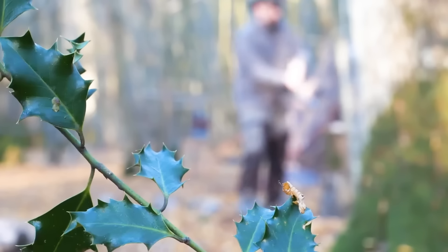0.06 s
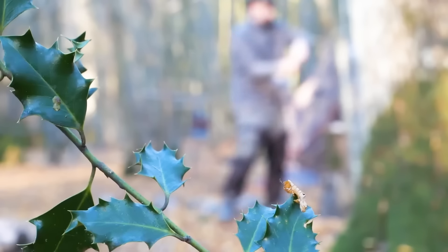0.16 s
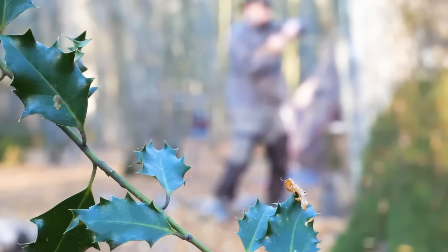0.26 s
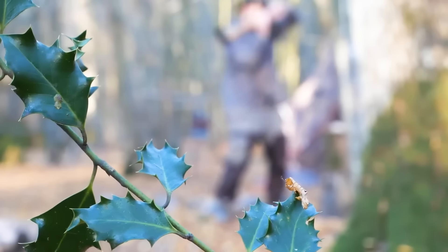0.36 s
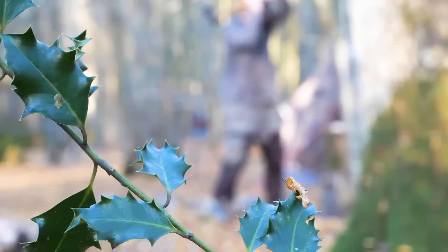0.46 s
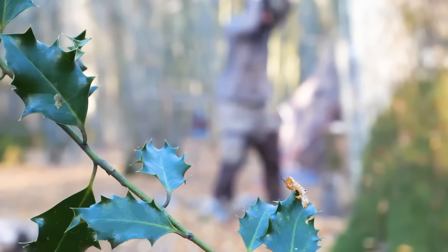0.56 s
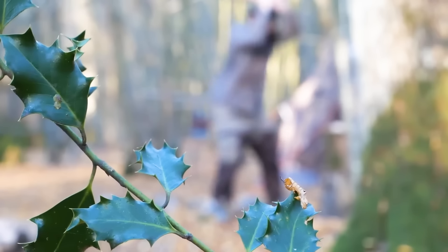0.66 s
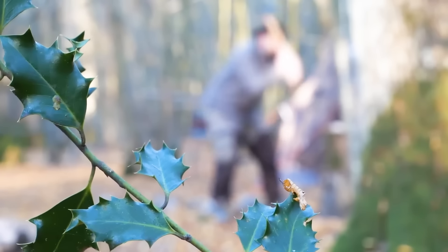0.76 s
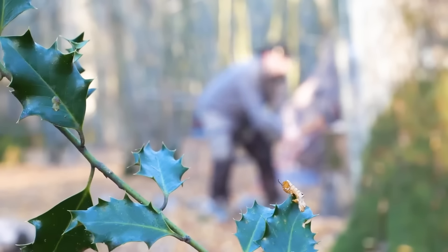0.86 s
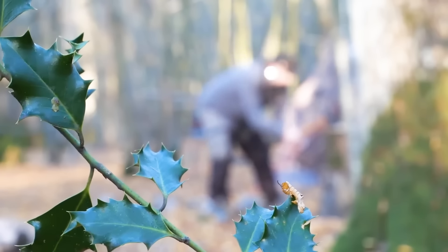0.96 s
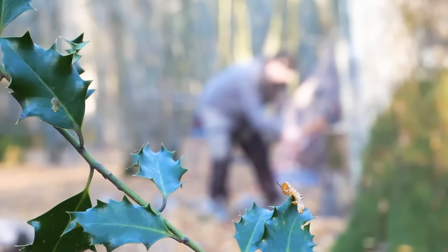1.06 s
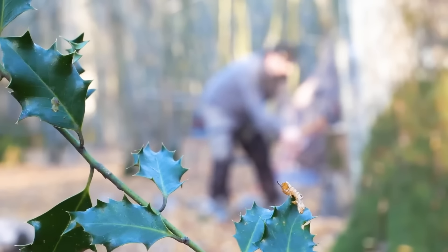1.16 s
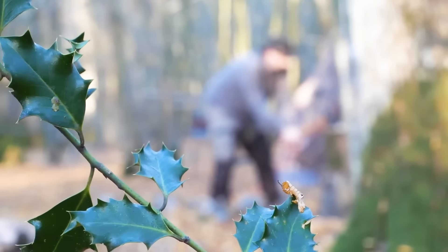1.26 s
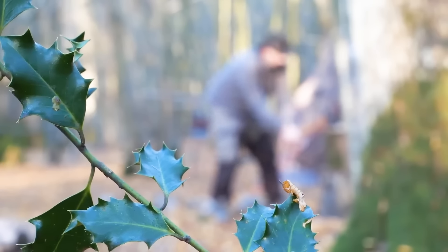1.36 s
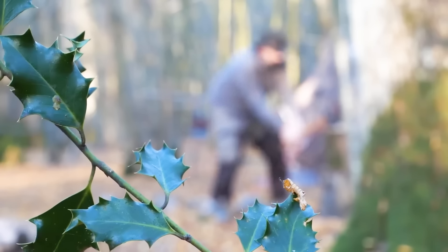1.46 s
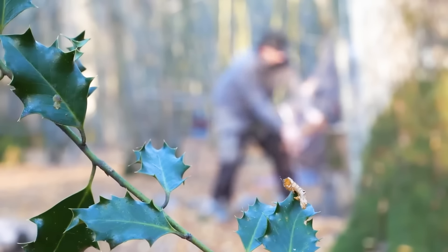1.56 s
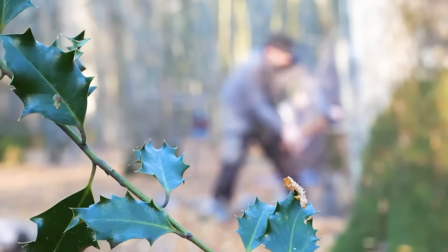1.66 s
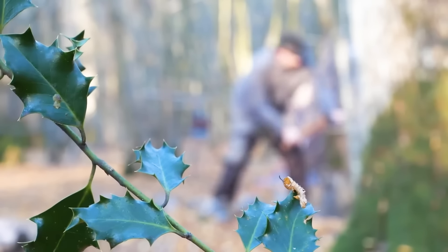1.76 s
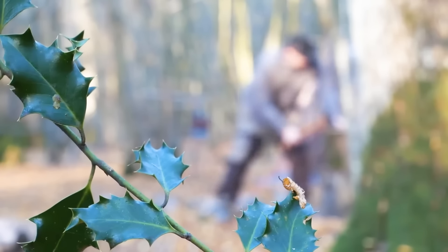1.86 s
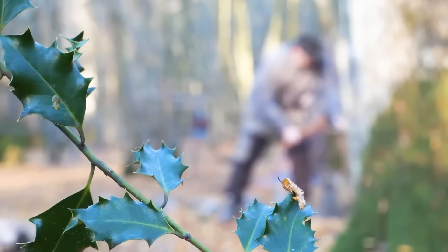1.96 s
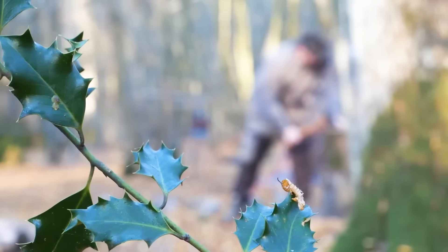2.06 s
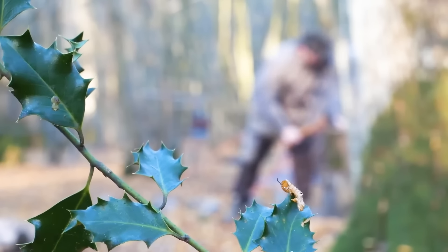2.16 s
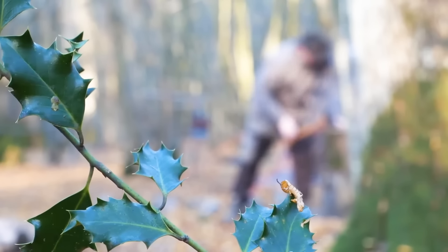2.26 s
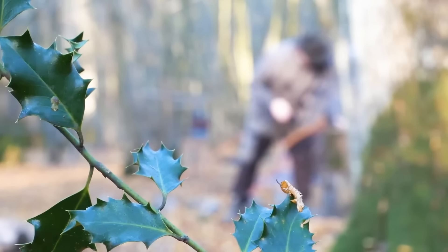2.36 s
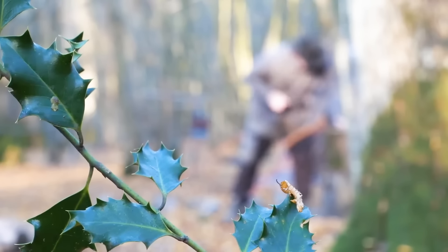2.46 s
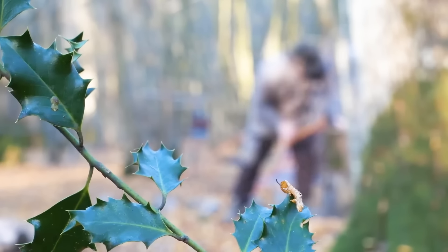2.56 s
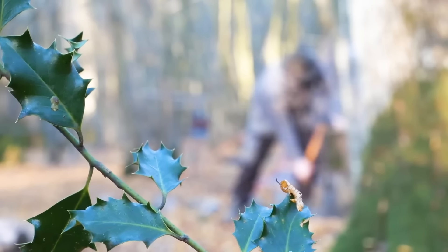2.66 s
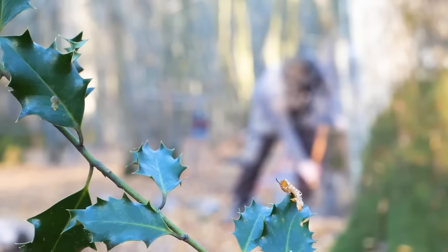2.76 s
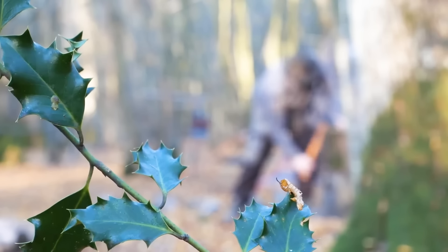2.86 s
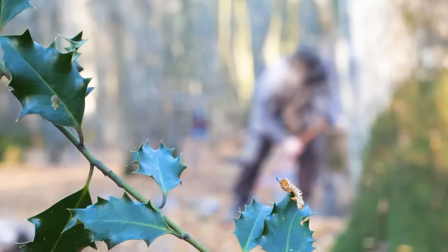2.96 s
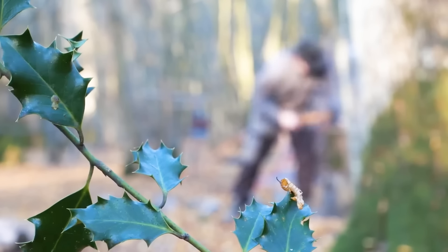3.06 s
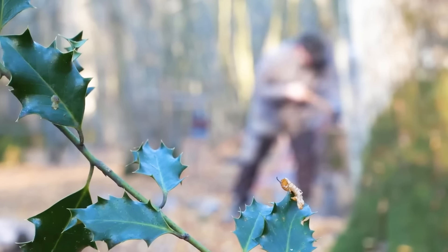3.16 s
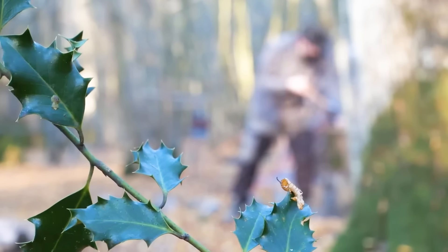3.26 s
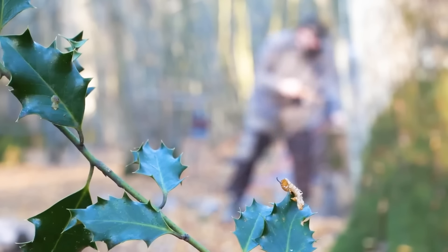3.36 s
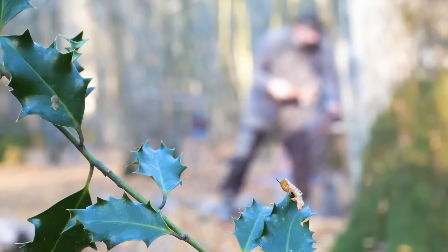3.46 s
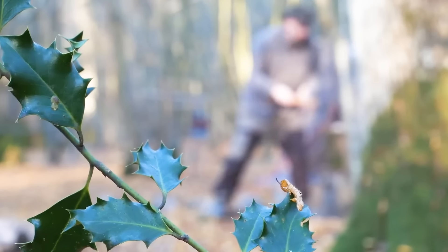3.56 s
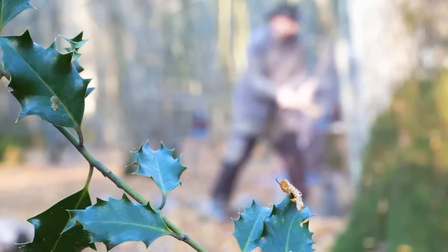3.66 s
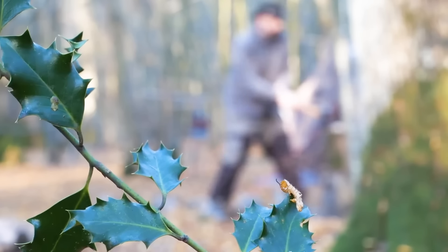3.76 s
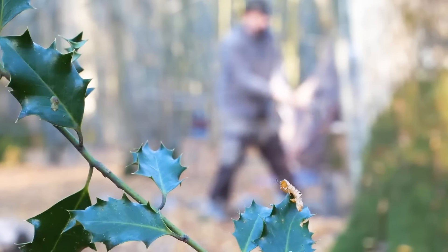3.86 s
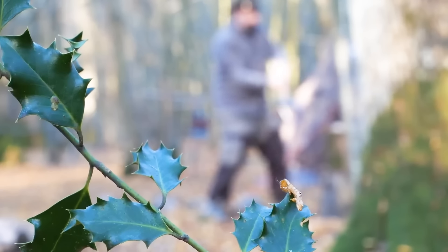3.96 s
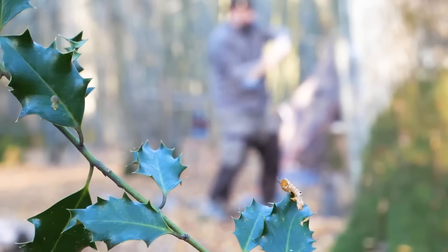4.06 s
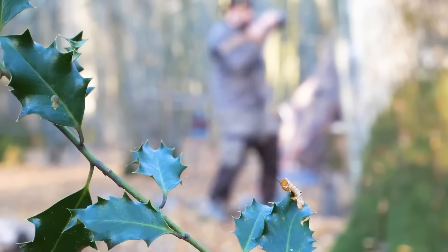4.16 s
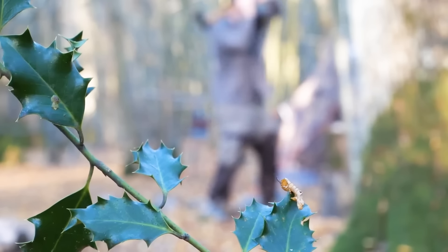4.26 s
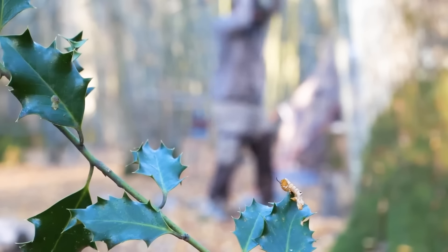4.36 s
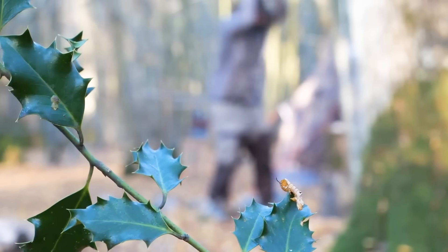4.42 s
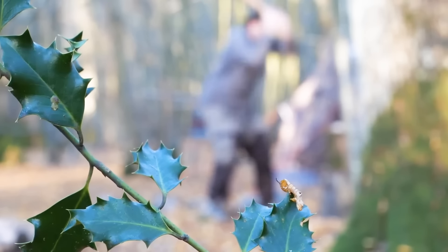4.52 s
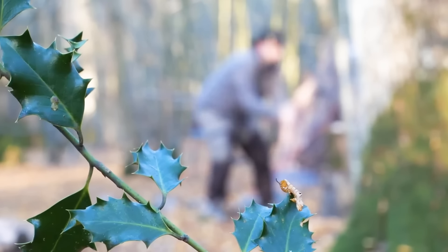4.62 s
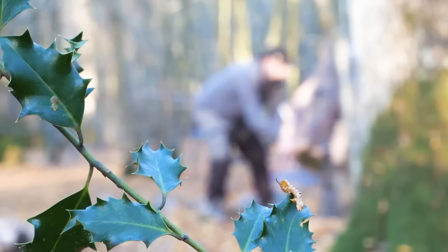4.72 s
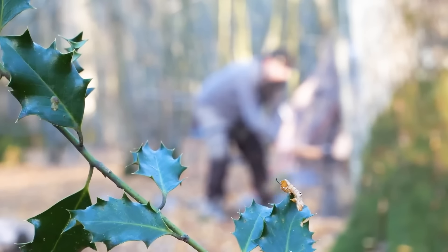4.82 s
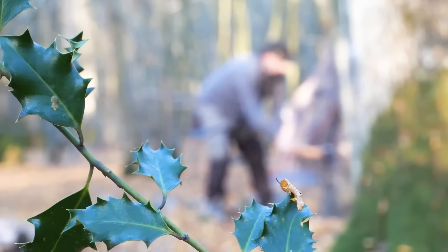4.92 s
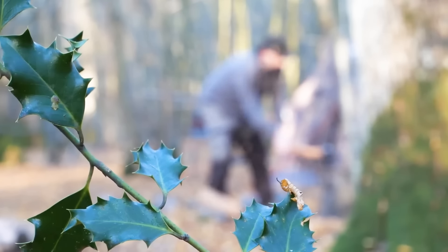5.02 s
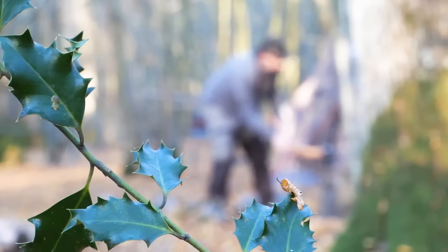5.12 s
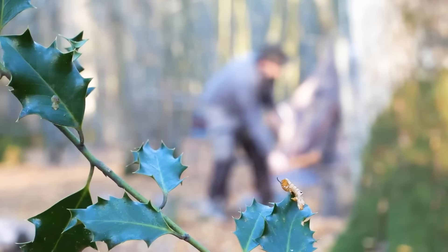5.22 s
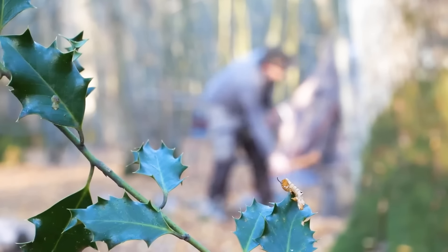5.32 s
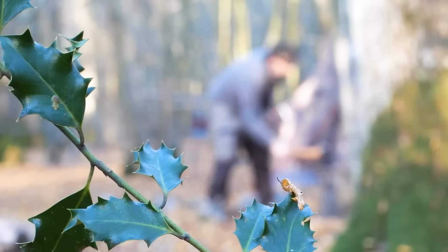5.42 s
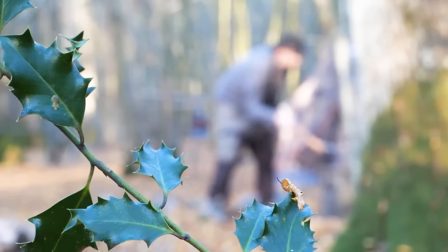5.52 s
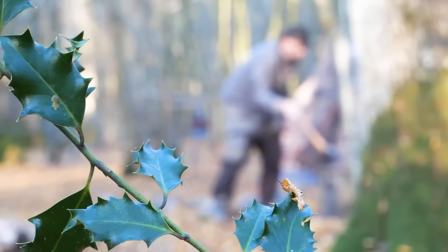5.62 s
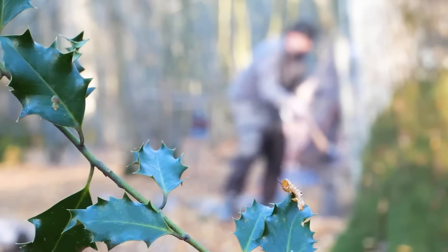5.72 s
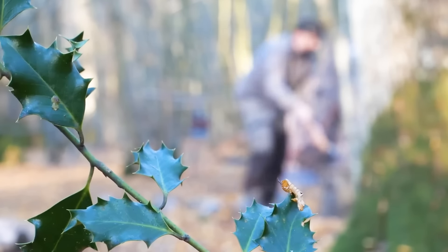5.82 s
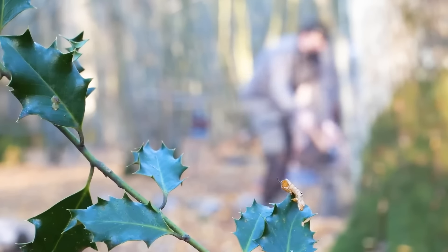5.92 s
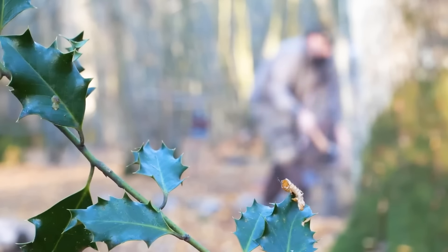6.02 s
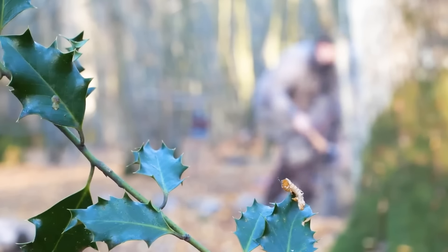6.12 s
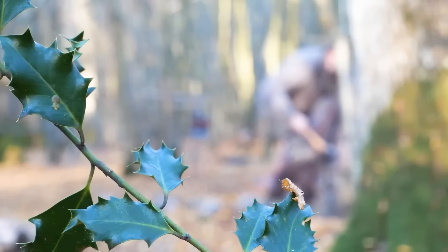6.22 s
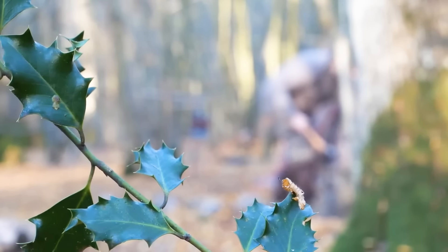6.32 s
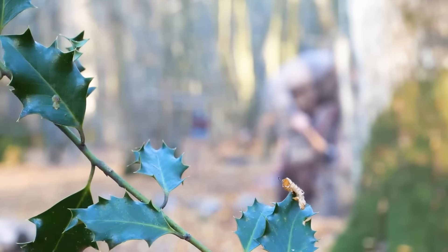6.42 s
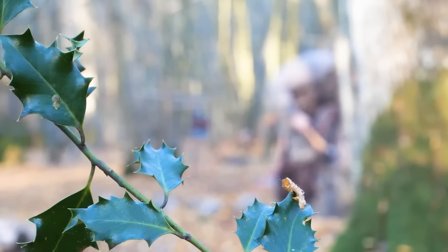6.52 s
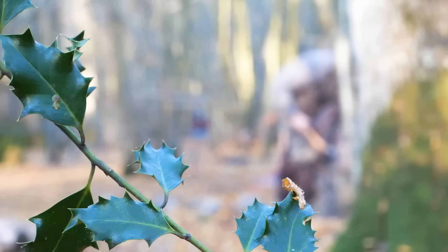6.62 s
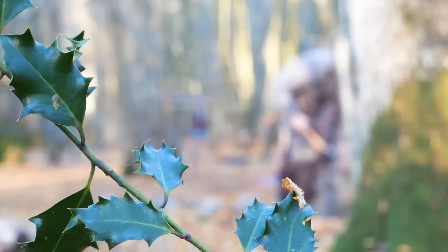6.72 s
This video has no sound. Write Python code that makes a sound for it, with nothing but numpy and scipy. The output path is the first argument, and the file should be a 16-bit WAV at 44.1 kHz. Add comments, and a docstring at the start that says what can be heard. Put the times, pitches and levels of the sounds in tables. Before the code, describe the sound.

Quiet woodland with a steady, faint far rush and low hum. A jacket swishes, leaves stir and twigs snap, then an axe cracks a log loudly, its echo scattering off the trunks. Wood is set on the block with a soft knock, a billet clacks, and a second hard blow splits it. Rustles and thuds follow, then a thin bird whistle. One microphone hears the work among the trees.

```python
"""A quiet wood, heard by one microphone: a steady far rush of filtered noise and a far humming sine lie behind.
First a jacket swishes, dry leaves stir and twigs snap, all shaped noise; then an axe cracks a log on a block.
Decaying sines ring the log, noise tears its fibres, and a random echo tail scatters the crack off the trunks.
Wood is stood on the block and a billet clacks, both struck modes; the hum swells once.
The second blow splits the half log, with more moves and thuds after it; last comes a thin, sliding bird whistle."""
import sys
import numpy as np
from scipy import signal
from scipy.fft import rfft, irfft
from scipy.io import wavfile

SR = 44100
rng = np.random.default_rng(int(sys.argv[2]) if len(sys.argv) > 2 else 0)


def persist_wave(psi):
    """Save psi, clipped to +-1, as 16-bit WAV."""
    counts = np.round(np.clip(psi, -1, 1) * 32767).astype(np.int16)
    wavfile.write(sys.argv[1], SR, np.atleast_2d(counts).T)


N = 299327
TIME = np.arange(N) / SR
AGE = TIME[:SR // 3]   # time since a contact, s


def from_db(db):
    """Decibels to gain."""
    return 10 ** (np.asarray(db) / 20)


def rms_one(x):
    """Scale to an rms of 1."""
    return x / np.sqrt(np.mean(x ** 2) + 1e-20)


def at_hz(rows, hz):
    """Each column of a frequency table at the given pitches, interpolated over log frequency."""
    knots, *columns = np.transpose(rows)
    return [np.interp(np.log(hz + 1e-9), np.log(knots), column) for column in columns]


def noise(spectrum, size):
    """Noise of rms 1 with the given colour and nothing below hearing."""
    hz = np.arange(size // 2 + 1) * SR / size
    colour = from_db(at_hz(spectrum, hz)[0]) * (hz > 20)
    white = rng.standard_normal(size)
    return rms_one(irfft(rfft(white) * colour, size))


def drift(rate):
    """Slow chance of rms 1, drawing a new value rate times a second with straight lines between."""
    return rms_one(np.interp(TIME * rate, np.arange(N), rng.standard_normal(N)))


def swell(peak_s, rise_s, fall_s, range_db=20, roundness=1.46):
    """A gain that climbs to 1 at the given moment and settles again, by range_db over its rise and fall."""
    away = np.maximum((peak_s - TIME) / rise_s, (TIME - peak_s) / fall_s)
    # roundness 1 makes a pointed top, 2 a bell
    return from_db(-range_db * np.minimum(away, 10) ** roundness)


def add(track, s, sound):
    """Mix a sound into the track at a time."""
    part = track[round(s * SR):][:len(sound)]
    part += sound[:len(part)]


def ring(modes, spread_s=0.000684):
    """Struck wood: decaying sines, staggered as the blow travels through the grain."""
    out = 0
    for k, (hz, db, t60) in enumerate(modes):
        age = np.maximum(AGE - spread_s * (k % 3), 0)
        sign = (-1) ** k
        out = out + sign * from_db(db - 60 * age / t60) * np.sin(2 * np.pi * hz * age)
    # a body radiates little below its lowest mode
    highpass = signal.butter(2, 0.6 * modes[0][0], "high", fs=SR, output="sos")
    return signal.sosfilt(highpass, out)


def burst(spectrum, hold_s, t60):
    """Fibres break in a quick run that holds briefly and dies away."""
    attack = 1 - np.exp(-AGE / 0.00006)
    decay = from_db(-60 * np.maximum(AGE - hold_s, 0) / t60)
    return noise(spectrum, len(AGE)) * attack * decay


# colour of the far wind and traffic: [f/Hz, relative level/dB per Hz]
AIR_COLOUR = [(15, -56), (25, -24), (46, -5.5), (69, 0), (169, -1.5), (204, -4.5), (246, -7), (389, -4),
              (421, -2), (648, -1), (1240, -10), (1530, -12), (2060, -17), (8580, -26), (10500, -33.5),
              (15500, -38)]


def far_air(level_db=-51):
    """Far wind and traffic merge into a steady rush of coloured noise that barely drifts in level."""
    return from_db(level_db + 0.39 * drift(3.3)) * noise(AIR_COLOUR, N)


def hum(hz=198.3, level_db=-67, swell_db=-59.5, climb_hz=6.37):
    """A far engine's low note rises with its load and wavers on its way through the wood."""
    load = swell(peak_s=3.8, rise_s=0.456, fall_s=0.367)
    waver = from_db(1.6 * drift(27))
    gain = (from_db(level_db) + from_db(swell_db) * load) * waver
    pitch_hz = hz + climb_hz * load + 4 * drift(25)
    return gain * np.sin(2 * np.pi * np.cumsum(pitch_hz) / SR)


# colour of the swishing jacket: [f/Hz, relative level/dB per Hz]
CLOTH_COLOUR = [(1500, -21), (4000, -4.5), (6200, -4.5), (7400, -0.5), (8500, 0), (9700, -7.5), (12500, -2),
                (15500, -13.5)]
# colour of the dry leaves: [f/Hz, relative level/dB per Hz]
LEAF_COLOUR = [(300, 9.5), (1300, 6), (2500, 3.5), (4500, 4), (8000, -2), (11000, -14), (15500, -36)]
# moves of the body: [t at the height/s, rise/s, fall/s, jacket level/dB, leaves level/dB]
BODY_MOVES = [(0.06, 0.19, 0.23, -60, -59.5), (0.265, 0.1, .135, -55, -53), (0.467, .075, 0.15, -59, -55),
              (1.675, 0.13, 0.2, -59.5, -59.5), (2.045, 0.19, 0.18, -58.5, -57.5),
              (4.03, 0.18, 0.25, -57.5, -65), (4.977, 0.059, 0.071, -53, -49.5),
              (5.09, 0.16, 0.19, -63, -56.5), (5.243, .04, 0.055, -61, -67),
              (5.508, 0.072, .11, -53.5, -50.5), (5.645, 0.089, 0.095, -68, -58.5),
              (5.885, 0.12, .11, -57.5, -70), (6.05, 0.084, 0.18, -51, -58.5)]


def rustle():
    """With every move, cloth swishes almost smoothly and dry leaves crackle in clumps."""
    cloth = noise(CLOTH_COLOUR, N) * rms_one(from_db(1.1 * drift(250)))
    leaves = noise(LEAF_COLOUR, N) * rms_one(from_db(3.1 * drift(600)))
    out = np.zeros(N)
    for s, rise_s, fall_s, jacket_db, leaves_db in BODY_MOVES:
        rubbed = from_db(jacket_db) * cloth + from_db(leaves_db) * leaves
        out += swell(s, rise_s, fall_s) * rubbed
    return out


# twigs snapping underfoot: [t/s, level/dB, length before the decay/s]
TWIG_SNAPS = [(0.2823, -39, 0.0004), (0.289, -42, 0.0009), (0.429, -38, 0.00054), (0.457, -36, 0.00083),
              (0.467, -47, 0.0026), (1.848, -53, 0.0016), (3.9425, -51, 0.0016)]
# colour of a snap, and of the grit in other contacts: [f/Hz, relative level/dB per Hz]
TWIG_COLOUR = [(100, -21), (600, 12.5), (1600, 3.5), (2500, 1.5), (4200, 4), (6000, 1.5), (8200, 1),
               (11000, -5.5), (15500, -0.5)]


def twigs():
    """Each twig underfoot gives way in a short burst of breaking fibres."""
    out = np.zeros(N)
    for s, db, length_s in TWIG_SNAPS:
        add(out, s, from_db(db) * burst(TWIG_COLOUR, hold_s=length_s, t60=0.021))
    return out


# weight on the forest soil, through the block, a falling piece or a boot:
# [t/s, level/dB, f/Hz, t60/s]
SOIL_THUDS = [(0.286, -56, 170, 0.042), (0.453, -37, 202, 0.055), (0.9051, -10.5, 183, 0.014),
              (0.911, -26, 100, 0.072), (2.644, -41.5, 225, 0.074), (4.735, -33, 170, 0.028),
              (4.7390, -24.5, 98, 0.036), (4.981, -40, 150, 0.12), (5.110, -30, 175, 0.02)]


def soil():
    """Soft ground answers a load with a few low, heavily damped cycles."""
    out = np.zeros(N)
    for s, db, hz, t60 in SOIL_THUDS:
        add(out, s, ring([(hz, db, t60)]))
    return out


# axe blows: [t/s, ring level/dB, crack level/dB, time the fibres take to tear/s, splinter level/dB]
AXE_BLOWS = [(0.904, -16, -13, 0.0034, -32), (4.7088, -10.5, -14, 0.0048, -30)]
# modes of the whole log, struck first: [f/Hz, level/dB, t60/s]
WHOLE_LOG_MODES = [(343, -24, 0.011), (550, 4, 0.0086), (700, -18, 0.024), (960, -4.5, 0.038),
                   (1255, 1, 0.021), (1353, 3.5, 0.017), (1670, -5, 0.032), (1860, 0.5, 0.03),
                   (1980, -27, 0.025), (2890, -7, 0.025), (3150, -13, 0.019), (4300, -8, .008),
                   (8300, -3, 0.0064)]
# modes of the half log, struck second: [f/Hz, level/dB, t60/s]
HALF_LOG_MODES = [(488, -5, 0.022), (530, -20, 0.014), (835, -12, 0.014), (1060, -2, 0.03),
                  (1227, 0.5, 0.023), (1376, 2.5, 0.022), (2070, -23, 0.024), (2460, -13, .02),
                  (2550, -7, 0.018), (3350, -21, 0.029), (8050, -3, 0.009)]
# colour of tearing fibres: [f/Hz, relative level/dB per Hz]
CRACK_COLOUR = [(50, -33), (250, 0.5), (700, -10.5), (1400, 7.5), (2800, 1.5), (4000, -3.5), (6000, -11),
                (8200, -7.5), (9500, -9.5), (12000, -13.5), (14500, -16), (16000, -24)]


def axe(ring_share_db=0):
    """The blade cracks the log, which rings; splinters go on tearing as the halves part."""
    out = np.zeros(N)
    logs = (WHOLE_LOG_MODES, HALF_LOG_MODES)
    for (s, ring_db, crack_db, tear_s, splinter_db), log in zip(AXE_BLOWS, logs):
        flicker = from_db(1.27 * drift(935)[:len(AGE)])
        splinters = burst(CRACK_COLOUR, hold_s=0.014, t60=0.1) * flicker
        crack = burst(CRACK_COLOUR, hold_s=tear_s, t60=0.0049)
        ringing = from_db(ring_db + ring_share_db) * ring(log)
        add(out, s, ringing + from_db(crack_db) * crack + from_db(splinter_db) * splinters)
    return out


# what the trunks send back: [f/Hz, level/dB, t60/s]
TRUNK_ECHOES = [(101, 7, 0.61), (300, -18, 1.1), (570, -13, 2.4), (814, -5.5, 1.43), (1300, -11, 1.58),
                (1880, -5.5, 1.23), (2840, -12, 1.15), (5970, -4.5, 0.73), (9050, -15.5, 0.53),
                (14100, -13, .45)]


def forest(x, near_db=-12, near_t60=0.13, trunks_per_s=1500, gap_s=0.0015):
    """Ground and near trunks echo almost at once; far trunks scatter a long tail, its treble soonest gone."""
    t = TIME[:3 * SR // 2]
    reached = 1 - np.exp(-np.maximum(t - gap_s, 0) / 0.0036)
    # sparse echoes of random strength and sign; neighbouring bands take different rows
    hits = rng.random((2, len(t))) < trunks_per_s / SR
    echoes = rng.standard_normal((2, len(t))) * hits + 1e-18
    near = from_db(near_db) * rms_one(reached * from_db(-60 * t / near_t60))
    edges_hz = np.geomspace(60, 16000, 15)
    response = 0
    for k, (low, high) in enumerate(zip(edges_hz, edges_hz[1:])):
        level_db, t60 = at_hz(TRUNK_ECHOES, np.sqrt(low * high))
        far = from_db(level_db) * rms_one(reached * from_db(-60 * t / t60))
        bandpass = signal.butter(2, [low, high], "band", fs=SR, output="sos")
        band = rms_one(signal.sosfilt(bandpass, echoes[k % 2]))
        # the band's part of a white echo of unit energy
        share = np.sqrt(2 * (high - low) / SR / len(t))
        response = response + share * band * np.hypot(near, far)
    return signal.fftconvolve(x, response)[:N]


def woodland(contacts, count=5, contacts_db=-4):
    """A crack differs in each direction, so the echoes from all around blend into a smooth wash."""
    out = np.zeros(N)
    for _ in range(count):
        sent_out = axe(ring_share_db=0.5) + from_db(contacts_db) * contacts
        out += forest(sent_out)
    return out / np.sqrt(count)


def wood_contacts(contacts, modes):
    """Wood meeting wood rings its modes under a short noise of grit."""
    out = np.zeros(N)
    for s, db, grit_db in contacts:
        grit = burst(TWIG_COLOUR, hold_s=0.0003, t60=0.042)
        add(out, s, from_db(db) * ring(modes) + from_db(grit_db) * grit)
    return out


# the axe head and wood bumping on the block: [t/s, level/dB, grit level/dB]
BLOCK_KNOCKS = [(2.6413, -32, -42), (4.7288, -27, -53), (4.7324, -22, -24), (4.7360, -27, -32.5)]
# modes of the chopping block: [f/Hz, level/dB, t60/s]
BLOCK_MODES = [(260, -20, 0.077), (740, -6, 0.051), (1262, -8, 0.089), (1335, 2.5, 0.018),
               (1786, -3.5, 0.045), (1925, -5, 0.019), (2800, -10.5, 0.018), (7600, 0, 0.0022)]


def block_knocks():
    """The axe head and wood knock dully on the block and set its modes ringing."""
    return wood_contacts(BLOCK_KNOCKS, BLOCK_MODES)


# a dry billet against wood: [t/s, level/dB, grit level/dB]
BILLET_CLACKS = [(3.2231, -36.5, -38.5)]
# modes of the billet: [f/Hz, level/dB, t60/s]
BILLET_MODES = [(1860, 4, 0.023), (1940, -14, .025), (2520, 1, .025), (2930, 2, 0.024), (4380, -10, 0.057),
                (5460, -9, 0.029), (14300, 1, .005)]


def billet_clacks():
    """A dry billet clacks against wood, its modes higher than the block's lowest."""
    return wood_contacts(BILLET_CLACKS, BILLET_MODES)


def bird(peak_s=6.72, rise_s=0.19, fall_s=0.2, note_hz=7020, level_db=-67, slide_hz=450, slide_s=0.06):
    """A thin, high whistle, a near sine, slides down onto its note as it swells, and quivers."""
    age = np.maximum(TIME - (peak_s - rise_s), 0)
    hz = note_hz + slide_hz * np.exp(-age / slide_s) + 75 * drift(400)
    tone = np.sin(2 * np.pi * np.cumsum(hz) / SR)
    return from_db(level_db) * swell(peak_s, rise_s, fall_s) * tone


def scene():
    """All the work is heard among the trees by one microphone, over a steady far rush."""
    contacts = twigs() + block_knocks() + billet_clacks()
    background = far_air() + hum() + bird()
    work = rustle() + contacts + soil() + axe()
    mono = background + work + woodland(contacts)
    return np.array([mono, mono])


# colour of a faint hiss that differs between the two channels: [f/Hz, relative level/dB per Hz]
HISS_COLOUR = [(30, 10), (500, 3), (1500, -14), (6000, -19.5), (8500, -20), (10500, -0.5), (15500, 1.5)]


def record(dry, top=0.78, hiss_db=-75.5, cutoff_hz=16250):
    """A faint, separate noise is mixed into left and right, loud peaks are rounded, the top treble is cut."""
    hiss = from_db(hiss_db) * np.array([noise(HISS_COLOUR, N), noise(HISS_COLOUR, N)])
    rounded = top * np.tanh((dry + hiss) / top)
    lowpass = signal.cheby2(16, 70, cutoff_hz, fs=SR, output="sos")
    return signal.sosfilt(lowpass, rounded)


dry = scene()
out = record(dry)
persist_wave(out)
```